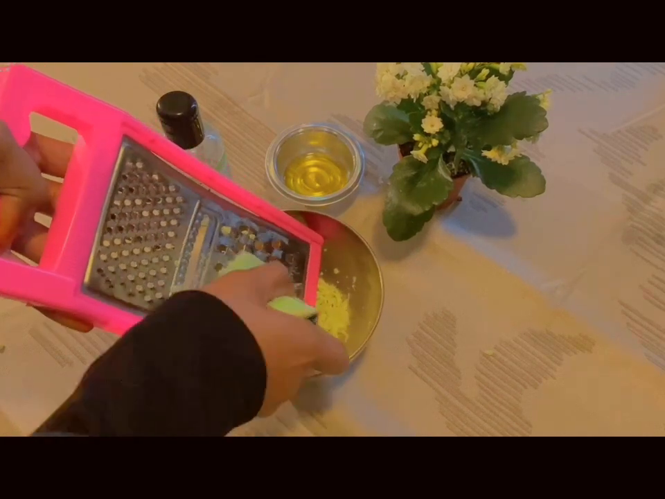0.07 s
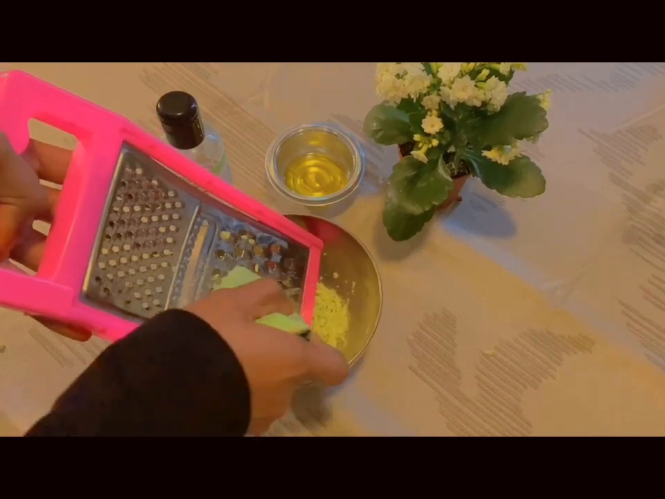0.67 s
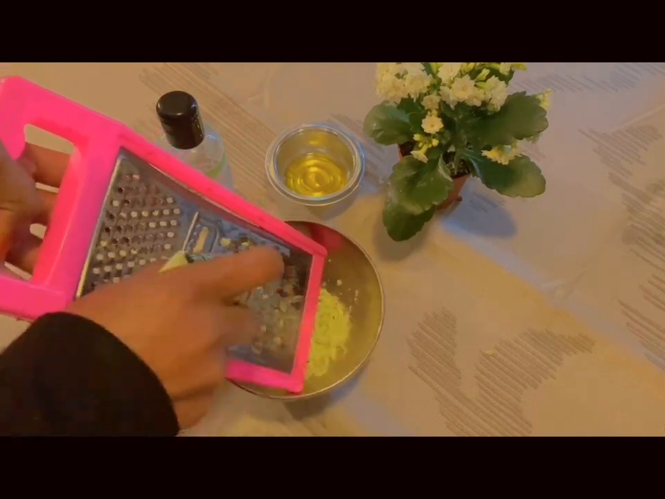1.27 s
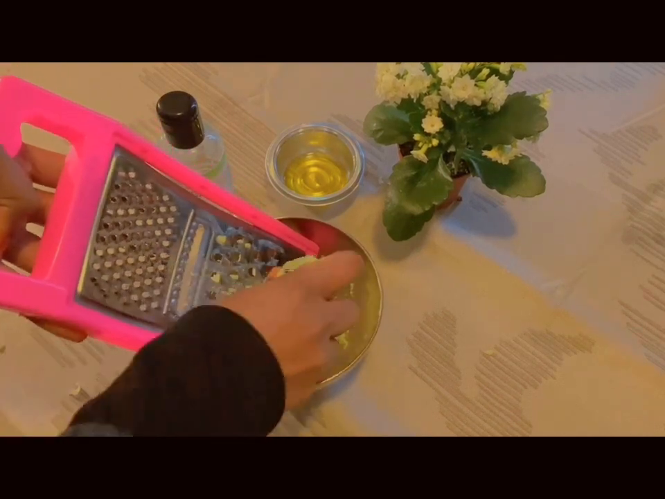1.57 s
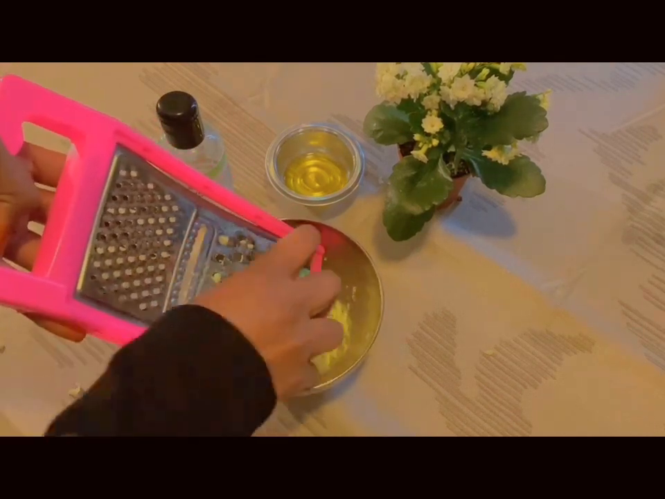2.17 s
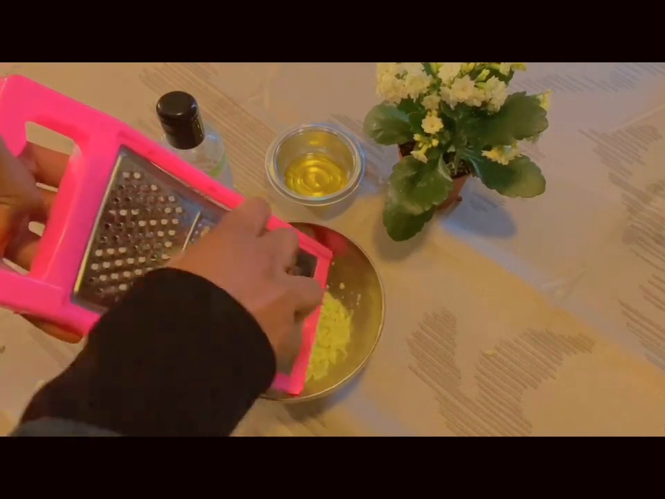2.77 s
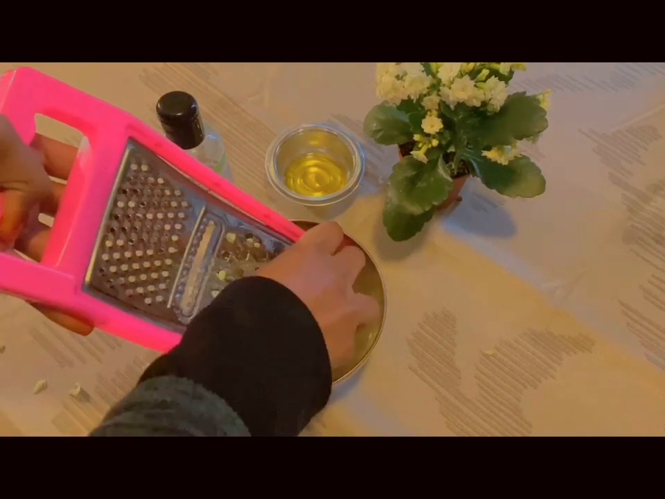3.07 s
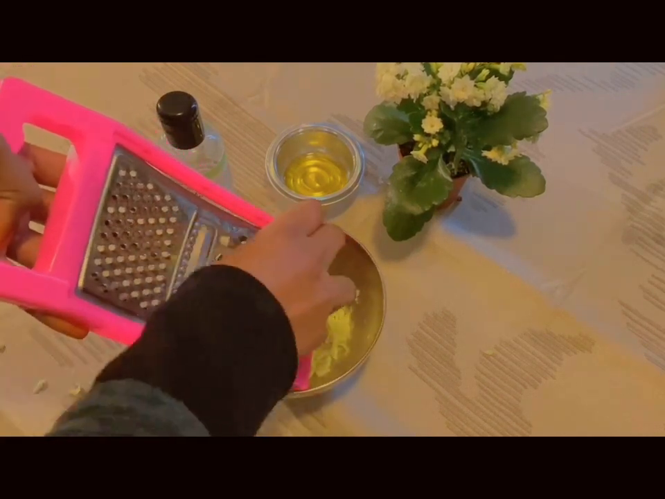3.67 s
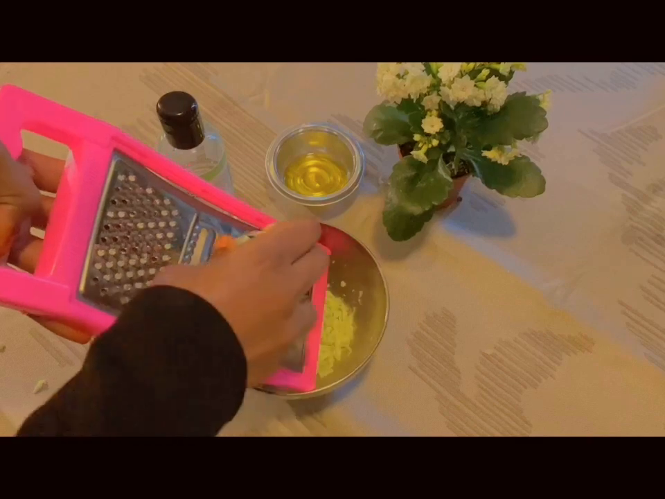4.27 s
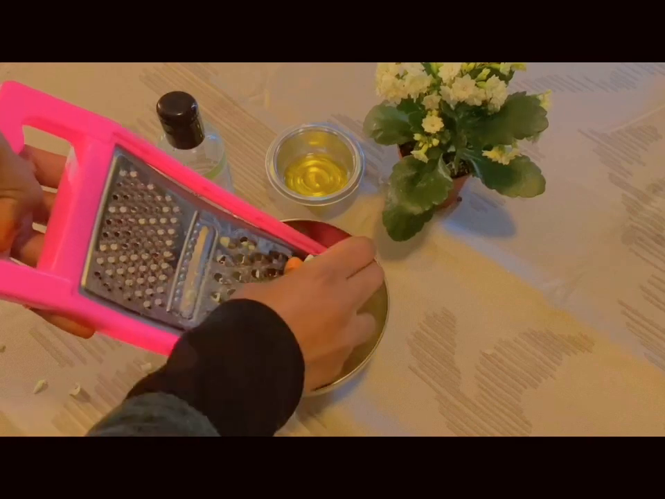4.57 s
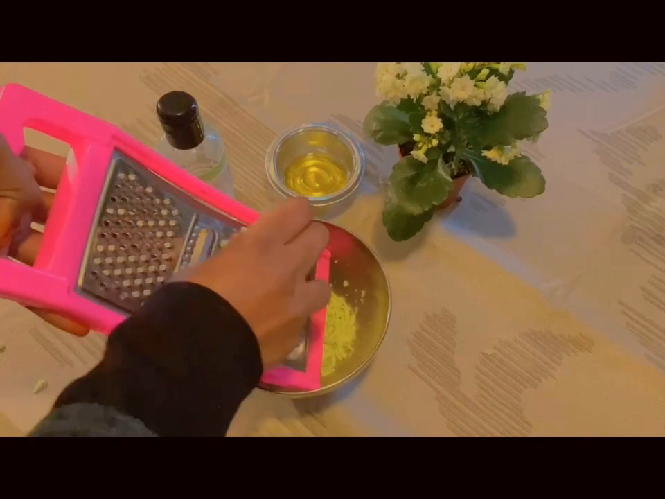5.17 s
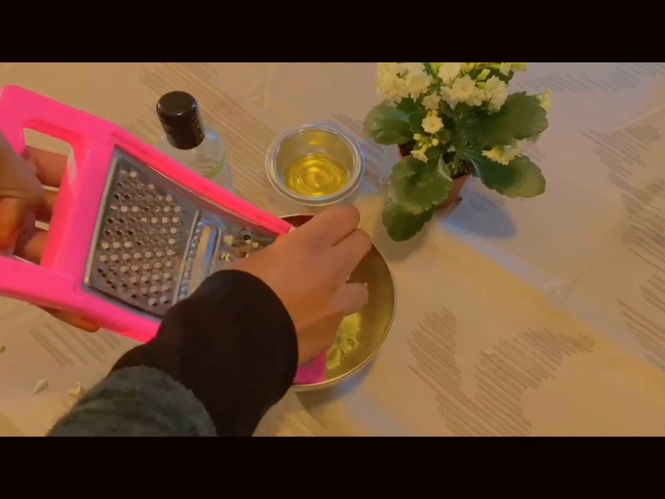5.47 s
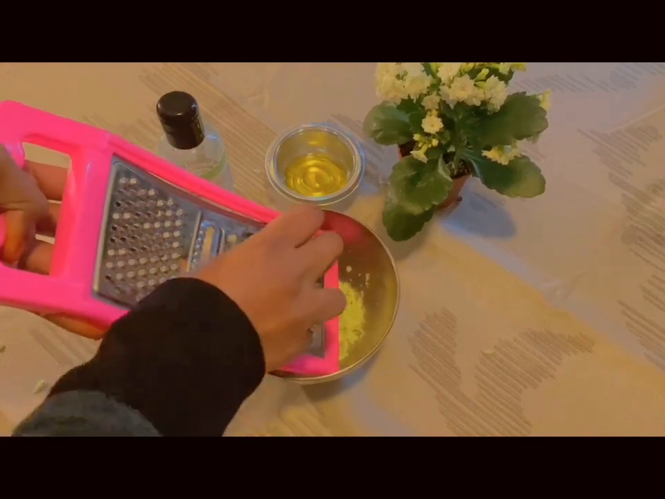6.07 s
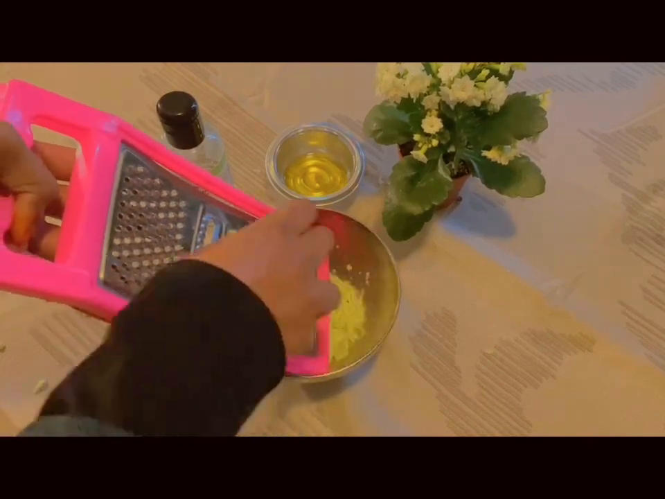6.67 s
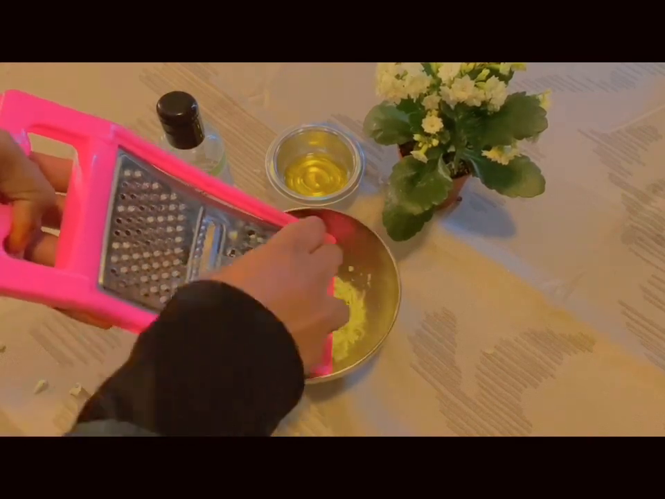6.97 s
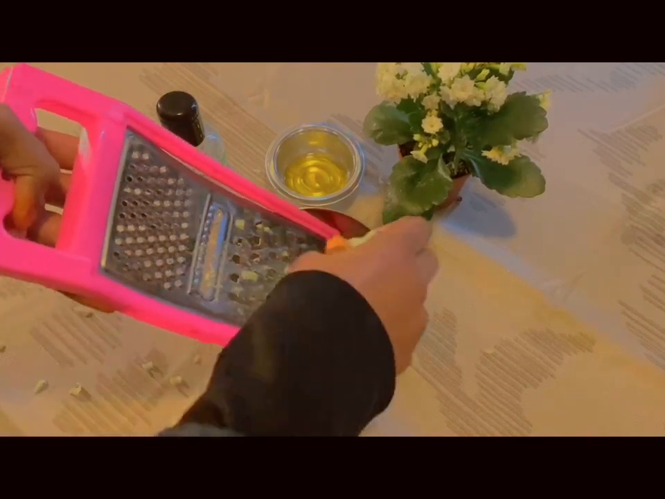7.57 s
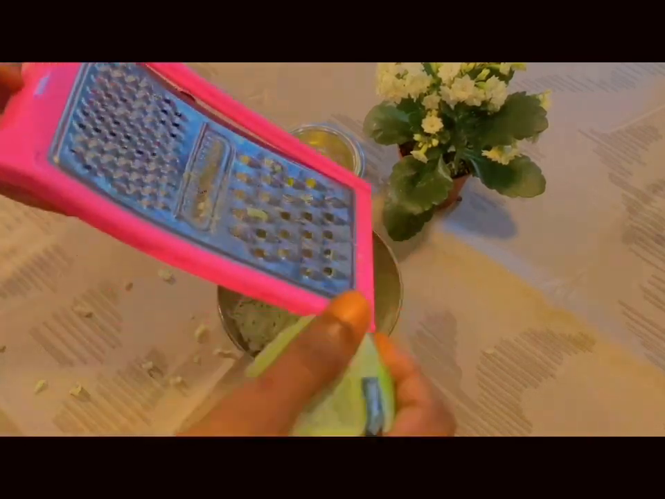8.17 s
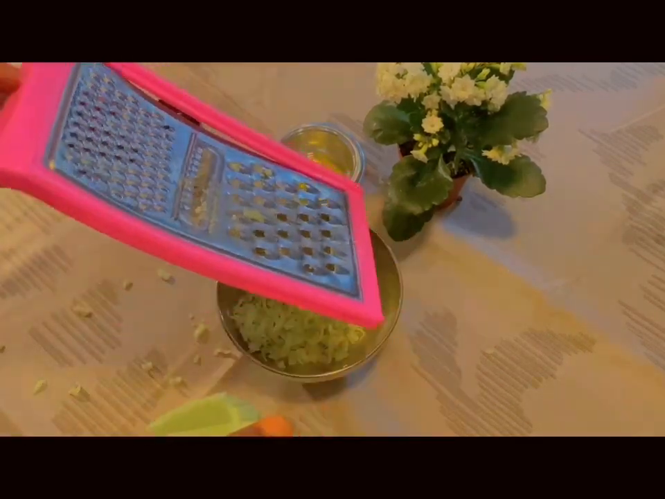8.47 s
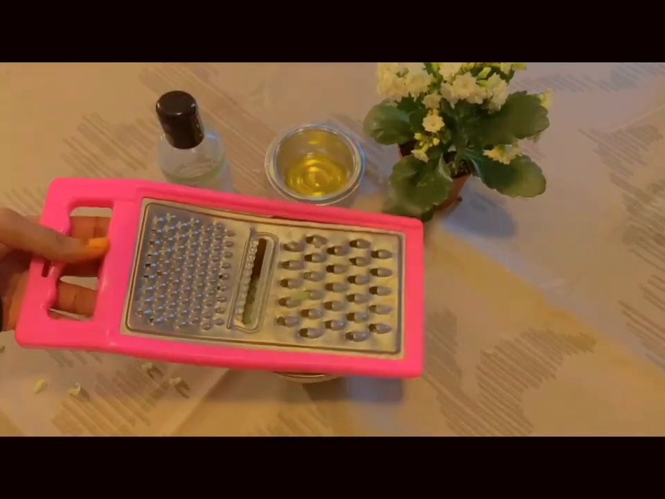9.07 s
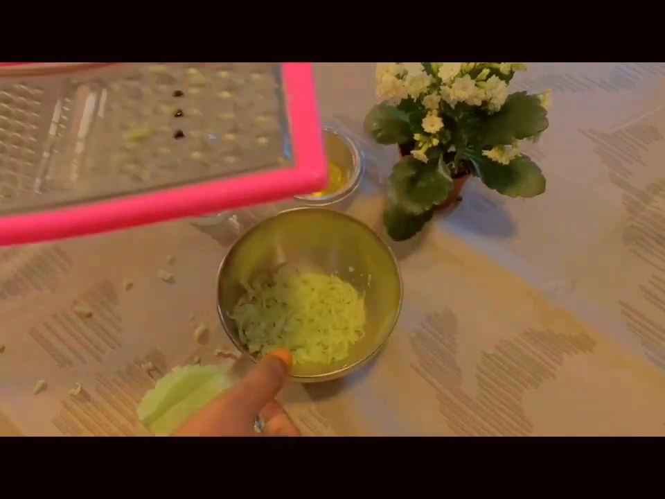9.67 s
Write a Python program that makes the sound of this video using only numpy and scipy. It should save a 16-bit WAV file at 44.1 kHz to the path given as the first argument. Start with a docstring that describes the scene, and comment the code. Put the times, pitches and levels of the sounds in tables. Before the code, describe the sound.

A soap bar scrapes back and forth over a grater with thuds and plastic clicks, followed by a few ringing knocks on a bowl.

```python
"""Small room, metal bowl on a table: soap is rubbed to and fro over a steel grater resting on the bowl.
The teeth catch and let go: the table rumbles, the blade rasps, the plastic frame clicks.
Sliding soap hisses; chunks and flakes snap off. Then the grater is lifted and knocked on the bowl,
which rings and thumps the table. Two closely spaced microphones."""
import sys
import numpy as np
from scipy import signal
from scipy.fft import rfft, irfft, next_fast_len
from scipy.io import wavfile
from scipy.ndimage import map_coordinates

SR = 44100
rng = np.random.default_rng(int(sys.argv[2]) if len(sys.argv) > 2 else 0)


def master(y):
    """Save y as 16-bit WAV."""
    cut = np.clip(np.atleast_2d(y).T, -1, 1)
    pcm = np.round(cut * 32767)  # scale
    wavfile.write(sys.argv[1], SR, pcm.astype(np.int16))


N = 433062

# Table levels are relative; each source adds its own gain.
# strokes into the teeth, back over their blunt sides: (time [s], length [s], drag [dB], hiss [dB])
PUSH_STROKES = [(0.241, 0.061, -44.5, -74), (0.953, 0.092, -39, -62.5), (1.592, 0.14, -42.5, -70),
                (2.327, 0.055, -38.5, -68), (3.072, 0.071, -37, -70.5), (3.856, 0.15, -40, -71),
                (4.62, 0.084, -37.5, -67), (5.422, 0.1, -37, -60.5), (6.263, 0.054, -39.5, -67.5),
                (6.812, 0.19, -44, -72.5)]
RETURN_STROKES = [(0.0, 0.005, -44, -73), (0.458, 0.13, -53, -77), (1.173, 0.37, -48, -81),
                  (1.908, 0.26, -48, -71.5), (2.683, 0.16, -46, -85), (3.3, 0.57, -52, -85),
                  (4.179, 0.19, -44.5, -74.5), (5.018, 0.25, -47, -79), (5.855, 0.16, -50.5, -82),
                  (6.453, 0.15, -44.5, -69)]
# soap jerks free: (time [s], scrape [dB], table thud [dB], frame thud [dB])
SOAP_SLIPS = [(0.456, -49, -41, -67), (0.613, -50.5, -44, -52.5), (0.917, -46, -44, -44),
              (0.975, -47, -33.5, -60), (1.208, -43, -39.5, -56), (1.287, -43.5, -41.5, -63),
              (1.321, -46, -34.5, -44.5), (1.616, -37, -63, -67), (1.671, -50, -42, -56),
              (1.891, -50.5, -44.5, -61), (2.016, -42.5, -41.5, -67), (2.335, -34, -36, -51),
              (2.408, -37, -34.5, -53), (2.582, -43.5, -41, -58), (2.691, -56, -40.5, -50),
              (2.744, -41, -38.5, -47.5), (2.86, -49, -36.5, -46.5), (3.074, -37, -32.5, -48),
              (3.122, -39.5, -34.5, -41.5), (3.295, -58, -42.5, -52.5), (3.388, -50, -53, -58),
              (3.441, -50, -44.5, -48), (3.603, -44.5, -39.5, -46.5), (3.831, -42.5, -57, -39),
              (3.891, -33.5, -34, -50), (4.288, -39, -33, -44.5), (4.632, -46.5, -34.5, -35.5),
              (4.715, -36, -33, -53), (4.868, -41, -44.5, -54.5), (5.034, -38, -43, -52),
              (5.405, -35.5, -58, -54), (5.463, -52, -33.5, -37), (5.497, -37, -29.5, -37),
              (5.677, -38.5, -36.5, -51), (5.873, -37.5, -65, -72), (6.088, -44, -42.5, -47.5),
              (6.255, -43, -39, -59), (6.748, -48.5, -50.5, -64), (6.895, -38.5, -41.5, -65),
              (6.984, -58, -43.5, -54)]
# soap breaks off: (time [s], level [dB])
CHUNK_CRACKS = [(1.017, -38), (4.688, -35), (5.4645, -25), (5.4965, -22.5), (5.5225, -34.5)]
FLAKE_SNAPS = [(0.636, -61), (1.899, -52.5), (2.382, -49), (2.939, -60.5), (4.326, -53), (6.316, -50.5),
               (6.861, -46.5)]
# sharp plastic clicks: (time [s], level [dB], hollow body [dB], bright edge [dB])
FRAME_CLICKS = [(0.4618, -41.5, -28, -8.5), (1.3218, -34, -18, -15), (1.372, -45.5, -11, 5),
                (1.4133, -32.5, 23, -20.5), (1.4504, -29.5, -4.5, -5.5), (1.5417, -49, 23.5, -13),
                (1.67, -37, 1.5, -17.5), (2.027, -39, -6, -14.5), (2.2942, -35.5, -3, -17),
                (2.781, -57, 19, 0), (4.265, -43, -19, -24), (4.585, -46.5, 6.5, -8), (4.633, -47, 15, -18),
                (5.025, -37, 2, -17.5), (5.079, -32, 10, -29.5), (5.4984, -40, -7, -2.5),
                (6.1953, -52, 18, -10), (6.2126, -44.5, 18.5, -13), (6.421, -45, -1, -6.5),
                (6.551, -42, 12, 2.5), (6.64, -67, 11, 16.5), (6.824, -38, 1, -5.5), (7.1631, -54, 0, -10),
                (7.2775, -52.5, -3, -2), (7.9964, -34.5, -0.5, -4), (8.0662, -53.5, -16, -24),
                (9.3467, -44.5, -2, -16.5), (9.3962, -32.5, -1.5, -12.5)]
# frame hits bowl: (time [s], level [dB], hollow body [dB], bright edge [dB], thump [dB], ring [dB])
BOWL_KNOCKS = [(7.5499, -30.5, 4.5, -4.5, -14.5, -19.5), (7.6059, -44, 6, -10.5, 2.5, -15.5),
               (8.83, -23, -20.5, -15, -7.5, -30), (8.855, -31.5, -2, -32, 2, -34),
               (9.0205, -19, -10, -6.5, -7.5, -32)]
# rubs on the blade, grip shifts, turning in the hands: (time [s], length [s], level [dB])
BLADE_SCUFFS = [(1.387, 0.0088, -51.5), (6.469, 0.02, -55), (7.267, 0.0173, -60.5), (8.727, 0.034, -71.5)]
GRIP_SHIFTS = [(7.936, 0.049, -73), (8.97, 0.17, -68.5), (9.205, 0.01, -62)]
HAND_TURNS = [(7.796, 0.62, -80), (9.643, 0.22, -79)]
# body modes: (frequency [Hz], width [Hz], level [dB])
TABLE_MODES = [(46, 15, 1), (90, 16, 2), (120, 18, -3.5), (150, 30, -11), (199, 22, -7), (221, 16, -4.5)]
FRAME_MODES = [(180, 14, -4.5), (217.5, 27, -1), (284.2, 38, -4.5), (375.5, 17, -1.5), (459, 13, -5.5),
               (524, 13, -16)]
# bowl modes: (frequency [Hz], level [dB], t60 [s])
BOWL_MODES = [(1055, 1, 0.22), (1826, -14, 0.49), (1986, 4.5, 0.085), (3030, -5.5, 0.39),
              (4465, -5.5, 0.36), (5900, -7, 0.34), (9846, -9, 0.22), (10500, 3.5, 0.13)]
# rasp bands of the teeth: (low [Hz], high [Hz])
TOOTH_BANDS = [(300, 1400), (1400, 2400), (2400, 15000)]
# spectra of blade, friction, contacts and room noise: (frequency [Hz], level [dB])
RASP_SPECTRUM = [(200, -21), (500, -4.5), (820, -10.5), (1100, 1.5), (1400, -7.5), (1850, -4.5),
                 (2500, -18.5), (5000, -26), (10000, -38), (16000, -36.5)]
HISS_SPECTRUM = [(400, -28), (1400, 0), (1900, 3.5), (2700, 0), (5500, 6), (7500, -4), (8500, 1.5),
                 (12000, 7.5), (14000, 0.5), (16000, -27.5)]
CLICK_SPECTRUM = [(100, -14), (500, -1), (1200, 1), (1850, 7), (2600, 0), (6000, 4), (7500, -4), (8400, 8),
                  (13000, 9), (16500, -12)]
KNOCK_SPECTRUM = [(50, -40.5), (150, -21), (500, 0), (850, -0.5), (1200, 7.5), (2600, -2), (4000, -3.5),
                  (6200, -5.5), (11000, 4.5), (16000, -15)]
AIR_SPECTRUM = [(20, -9.5), (45, 3.5), (110, 0), (1000, -17), (4000, -24), (7500, -43), (11000, -25.5),
                (14000, -55.5)]
# room decay: (frequency [Hz], t60 [s])
ROOM_DECAY = [(100, 0.66), (500, 0.41), (2000, 0.21), (6000, 0.15), (14000, 0.051)]
# lead of the left microphone: (frequency [Hz], phase [rad])
LEFT_LEAD = [(1700, 0), (4000, .6), (5200, .3), (7300, 3.1), (9800, 6), (10800, 6.5), (13700, 9.4),
             (16000, 12.4)]

# envelopes: (rise [s], sag [dB/s], release [s])
PUSH_SHAPE, RETURN_SHAPE = (0.023, 31, 0.02), (0.013, 14.2, 0.03)
SKID_SHAPE, GRIP_SHAPE = (0.074, 18, 0.24), (0.067, 10, 0.05)


def grating(hard_db=-31, table_db=22, frame_db=13.5, rasp_db=-13, crumb_db=-23):
    """Teeth tear the soap: a light rub only rumbles, a hard one wakes the frame and rasps."""
    excess_db = drag_db() - hard_db
    gain = lambda db, growth: amp(db + hard_db + growth * excess_db)
    tugs = grains(rate_hz=490, spread_db=4)
    rumble = boom(gain(table_db, growth=0.98) * tugs, TABLE_MODES)
    hollow = boom(gain(frame_db, growth=1.223) * tugs, FRAME_MODES)
    flex_s = .003 * wobble(rate_hz=12)  # frame bends, pitch wanders
    hollow = np.interp(np.arange(N) + flex_s * SR, np.arange(N), hollow)
    bands = [signal.butter(2, band, "band", fs=SR, output="sos") for band in TOOTH_BANDS]
    tearing = sum(signal.sosfilt(sos, crackle(rate_hz=90, spread_db=5, life_s=.003)) for sos in bands)
    rasp = gain(rasp_db, growth=1.8) * unit(blade(tearing))
    breaking = crackle(rate_hz=30, spread_db=4.5, life_s=.0024)
    dull_click = lambda hz: amp(along(CLICK_SPECTRUM, hz) + along(RASP_SPECTRUM, hz) / 2)
    crumbs = gain(crumb_db, growth=0.69) * unit(filtered(breaking, dull_click))
    return rumble + hollow + rasp + crumbs


def drag_db(rest_db=-60.5):
    """Drag on the teeth: the strongest of push, return and rest."""
    pushes = [amp(db) * swell(s, length_s, *PUSH_SHAPE) for s, length_s, db, _ in PUSH_STROKES]
    returns = [amp(db) * swell(s, length_s, *RETURN_SHAPE) for s, length_s, db, _ in RETURN_STROKES]
    return 20 * np.log10(np.max(pushes + returns + [amp(rest_db) * resting()], axis=0) + 1e-9)


def resting(lift_s=7.35, fade_s=0.0075):
    """1 while the soap lies on the blade, then fading to 0."""
    return np.exp(-np.maximum(np.arange(N) / SR - lift_s, 0) / fade_s)


def slips(table_db=29, frame_db=28, rasp_db=29, catch_db=-5, t60_s=0.021, sing_db=-7):
    """Each jerk shoves frame and table and scrapes the blade; the soap then catches more softly."""
    shoves, scrapes = np.zeros(N), np.zeros(N)
    pauses_s = rng.uniform(0.01, 0.019, len(SOAP_SLIPS))
    for (s, scrape_db, low_db, hollow_db), pause_s in zip(SOAP_SLIPS, pauses_s):
        table = amp(low_db + table_db) * thud(TABLE_MODES, detune=.01, vary_db=1.5)
        frame = amp(hollow_db + frame_db) * thud(FRAME_MODES, detune=.03, vary_db=3)
        add(shoves, s + 0.002115, table + frame)
        add(scrapes, s, amp(scrape_db + rasp_db) * burst(t60_s, attack_s=.002))
        add(scrapes, s + pause_s, amp(scrape_db + rasp_db + catch_db) * burst(t60_s, attack_s=.006))
    return shoves + blade(scrapes) + amp(sing_db) * sing(scrapes, width_hz=310)


def blade(force):
    """Thin steel, damped by soap: rasps without ringing."""
    return coloured(force, lambda hz: along(RASP_SPECTRUM, hz))[:N]


def sing(force, width_hz, hz=1850):
    """One broad resonance, by default the blade's main one."""
    return filtered(force, lambda f: resonance(f, hz, width_hz))


def boom(force, modes):
    """A body answers a force in its low modes."""
    response = lambda f: sum(amp(db) * resonance(f, hz, width_hz) for hz, width_hz, db in modes)
    band = signal.butter(2, [36, 1.3 * modes[-1][0]], "band", fs=SR, output="sos")
    return signal.sosfilt(band, filtered(force, response))


def thud(modes, detune, vary_db):
    """Unit-energy shove; pitch and share of each mode vary with where the soap sits, drawn at random."""
    t = np.arange(SR // 3) / SR
    bending = np.zeros(len(t))
    for hz, width_hz, db in modes:
        bend, size = rng.standard_normal(2)
        envelope = amp(db + vary_db * size) * width_hz / hz * np.exp(-np.pi * width_hz * t)
        bending += envelope * np.sin(2 * np.pi * hz * (1 + detune * bend) * t)
    onset = 1 - np.exp(-2 * t * modes[-1][0])  # half a cycle of the top mode
    return unit_energy(np.gradient(bending * onset))


def sliding(hiss_db=0.44, waver_db=3.5, chatter_db=-7):
    """Grainy friction under uneven pressure; teeth chatter at the blade's pitch."""
    friction = amp(waver_db * wobble(rate_hz=35)) * grains(rate_hz=3000, spread_db=5)
    hiss = unit(filtered(friction, lambda hz: amp(along(HISS_SPECTRUM, hz))))
    chatter = unit(sing(crackle(rate_hz=45, spread_db=4, life_s=.004), width_hz=350))
    return slide_gain() * (amp(hiss_db) * hiss + amp(chatter_db) * chatter)


def slide_gain(lead_s=0.062, rest_db=-84):
    """Friction gain: the strongest of the skid leading each push, return, grip and rest."""
    skids = [amp(db) * swell(s - lead_s, length_s + lead_s, *SKID_SHAPE)
             for s, length_s, _, db in PUSH_STROKES]
    returns = [amp(db) * swell(s, length_s, *RETURN_SHAPE) for s, length_s, _, db in RETURN_STROKES]
    grips = [amp(db) * swell(s, length_s, *GRIP_SHAPE) for s, length_s, db in GRIP_SHIFTS]
    return np.max(skids + returns + grips + [amp(rest_db) * resting()], axis=0)


def cracks(gain_db=29):
    """Chunks break off: one dry blow on the blade each."""
    return blade(snaps(CHUNK_CRACKS, gain_db, t60_s=.02))


def flakes(gain_db=21):
    """Flakes snap off teeth: bright ticks, too light to move the frame."""
    return coloured(snaps(FLAKE_SNAPS, gain_db, t60_s=.012), lambda hz: along(HISS_SPECTRUM, hz))[:N]


def clicks(gain_db=21, lead_s=0.0022, lead_db=-16):
    """Sharp plastic clicks, each with a faint tick just before it and a short rattle."""
    out = np.zeros(N)
    for s, db, body_db, edge_db in FRAME_CLICKS:
        for start_s, size_db in (s - lead_s, db + lead_db), (s, db):
            click = contact(CLICK_SPECTRUM, body_db, edge_db, t60_s=0.0089, rattle=0.18)
            add(out, start_s + .0005, amp(size_db + gain_db) * click)
    return out


def knocks(knock_db=25, table_db=26, frame_db=17, rebound_s=0.004):
    """The grater hits the bowl, which rings and passes the blow to the table."""
    out, thumps = np.zeros(N), np.zeros(N)
    rebound = unit_energy(np.sin(np.linspace(0, 2 * np.pi, round(rebound_s * SR))))
    for s, db, body_db, edge_db, thump_db, ring_db in BOWL_KNOCKS:
        hit = contact(KNOCK_SPECTRUM, body_db, edge_db, t60_s=0.021, rattle=0.56)
        add(out, s + 0.0012, amp(db + knock_db) * hit)
        add(out, s + 0.0009, amp(db + ring_db) * bowl())
        add(thumps, s + 0.0041, amp(db + thump_db) * rebound)
    table = amp(table_db) * boom(thumps, TABLE_MODES[1:])
    return out + table + amp(frame_db) * boom(thumps, FRAME_MODES)


def bowl():
    """One ring: each mode a beating pair, roughened by the touching grater."""
    t = np.arange(SR * 3 // 4) / SR
    ring = np.zeros(len(t))
    for hz, db, t60_s in BOWL_MODES:
        envelope = amp(db + rng.normal(0, 1.2) - 60 * t / t60_s)
        tone = np.sin(2 * np.pi * hz * t + .5 * wobble(rate_hz=160, size=len(t)))
        twin = np.sin(2 * np.pi * hz * rng.normal(1, .012) * t)
        ring += envelope * (tone + .5 * twin)
    return ring


def contact(spectrum, body_db, edge_db, t60_s, rattle):
    """Hard contact: brief chatter and a longer rattle, coloured by where it lands."""
    shelves = [(600, body_db / 6), (1250, body_db / 3), (1800, .8 * body_db), (2700, .6 * body_db),
               (4200, 0), (6000, 0), (9000, edge_db)]
    force = unit_energy(burst(t60_s) + rattle * burst(t60_s=0.13))
    return coloured(force, lambda hz: along(spectrum, hz) + along(shelves, hz))


def scuffs(rise_s=0.0036, release_s=0.0097):
    """Soap or fingers rub the blade: short, dull, no click."""
    gain = sum(amp(db) * swell(s, length_s, rise_s, 0, release_s) for s, length_s, db in BLADE_SCUFFS)
    return gain * unit(sing(crackle(rate_hz=600, spread_db=3, life_s=.001), width_hz=1100))


def handling(hz=3500, width_hz=7000):
    """Fingers stick and let go on plastic and soap: sparse ticks over a fine rustle."""
    gain = sum(amp(db) * swell(s, length_s, .01, 4, .02) for s, length_s, db in HAND_TURNS)
    ticks = crackle(rate_hz=18, spread_db=3, life_s=.002)
    rustle = crackle(rate_hz=400, spread_db=3, life_s=.002)
    return gain * unit(sing(sing(ticks + .6 * rustle, width_hz, hz), width_hz, hz))


def room(x, onset_s=0.00067, bass_hz=300):
    """Diffuse wall reflections, different at each microphone above the bass."""
    hz, t, noise = signal.stft(rng.standard_normal((2, SR // 2)), SR, nperseg=256)
    hz = hz[:, None]
    field = noise * amp(-60 * t / along(ROOM_DECAY, hz)) * (1 - np.exp(-t / onset_s))
    field *= hz ** 2 / (hz ** 2 + bass_hz ** 2)  # small table radiates little bass
    spread_rad = np.arccos(np.sinc(hz / 700)) / 2
    mid, side = field[0] * np.cos(spread_rad), field[1] * np.sin(spread_rad)
    tail = signal.istft(np.array([mid + side, mid - side]), SR, nperseg=256)[1]
    return signal.fftconvolve(x[None], tail / np.linalg.norm(tail[0]), axes=1)[:, :N]


def air(level_db=-73, side_db=-9):
    """Quiet room noise."""
    mid, side = filtered(rng.standard_normal((2, N)), lambda hz: amp(along(AIR_SPECTRUM, hz)))
    return amp(level_db) * unit(np.array([mid + amp(side_db) * side, mid - amp(side_db) * side]))


def swell(start_s, length_s, rise_s, sag_db_per_s, release_s):
    """Gain of one movement: builds up to start_s, sags, dies away."""
    t = np.arange(N) / SR - start_s
    edges = np.exp(np.minimum(t, 0) / rise_s - np.maximum(t - length_s, 0) / release_s)
    return edges * amp(-sag_db_per_s * np.clip(t, 0, length_s))


def grains(rate_hz, spread_db):
    """Tiny fractures: impulses of random time, sign and size."""
    happens = rng.random(N) < rate_hz / SR
    signs = rng.choice([-1, 1], N)
    return unit(happens * signs * amp(spread_db * np.clip(rng.standard_normal(N), -2, 2)))


def crackle(rate_hz, spread_db, life_s):
    """Tiny fractures, each a dying puff of noise."""
    decay = np.exp(-np.arange(SR // 20) / SR / life_s)
    power = signal.fftconvolve(grains(rate_hz, spread_db) ** 2, decay * (1 - decay))[:N]
    return unit(np.sqrt(np.abs(power)) * rng.standard_normal(N))


def snaps(events, gain_db, t60_s):
    """Force of breaking soap: one burst per event."""
    force = np.zeros(N)
    for s, db in events:
        add(force, s, amp(db + gain_db) * burst(t60_s))
    return force


def burst(t60_s, attack_s=0.0001):
    """Dying noise, energy 1."""
    t = np.arange(SR // 6) / SR
    return unit_energy(rng.standard_normal(len(t)) * amp(-60 * t / t60_s) * (1 - np.exp(-t / attack_s)))


def wobble(rate_hz, size=N):
    """Smooth random curve, knots at rate_hz."""
    knots = rng.standard_normal(int(size * rate_hz / SR) + 4)
    return map_coordinates(knots, [np.arange(size) * rate_hz / SR])


def resonance(f, hz, width_hz):
    """Complex response of one mode at f [Hz]."""
    return 1j * f * width_hz / (hz * hz - f * f + 1j * f * width_hz)


def coloured(x, spectrum_db, size=2048):
    """Minimum-phase filter with the given spectrum."""
    cepstrum = irfft(np.log(amp(spectrum_db(np.fft.rfftfreq(size, 1 / SR)))))
    cepstrum[1:size // 2] *= 2
    cepstrum[size // 2 + 1:] = 0
    return signal.fftconvolve(x, irfft(np.exp(rfft(cepstrum))))


def filtered(x, response):
    """Apply a complex frequency response."""
    size = next_fast_len(N + SR // 2)
    return irfft(rfft(x, size) * response(np.fft.rfftfreq(size, 1 / SR)), size)[..., :N]


def along(points, hz):
    """Interpolate (frequency [Hz], value) on a log axis."""
    knots_hz, values = np.transpose(points)
    return np.interp(np.log(hz + 1), np.log(knots_hz), values)


def add(track, start_s, sound):
    """Mix in at start_s."""
    part = track[max(round(start_s * SR), 0):][:len(sound)]
    part += sound[:len(part)]


def amp(db):
    """dB to gain."""
    return 10 ** (np.asarray(db) / 20)


def unit(x):
    """Scale to rms 1."""
    return x / np.sqrt(np.mean(x ** 2) + 1e-20)


def unit_energy(x):
    """Scale to energy 1."""
    return x / np.linalg.norm(x)


def scene(room_db=-11):
    """All sources at one spot; treble reaches the left microphone first."""
    soap = grating() + slips() + cracks() + flakes() + sliding() + scuffs()
    source = soap + clicks() + knocks() + handling()
    direct = filtered(source, lambda hz: np.exp(.5j * np.outer([1, -1], along(LEFT_LEAD, hz))))
    return direct + amp(room_db) * room(source) + air()


def record(dry, top_hz=16100):
    """Steep low-pass at the band limit."""
    return filtered(dry, lambda hz: 1 / np.sqrt(1 + (hz / top_hz) ** 160))


dry = scene()
out = record(dry)
master(out)
```